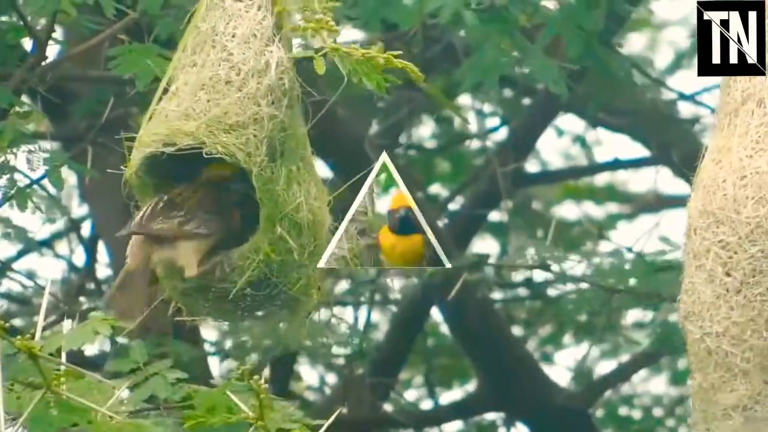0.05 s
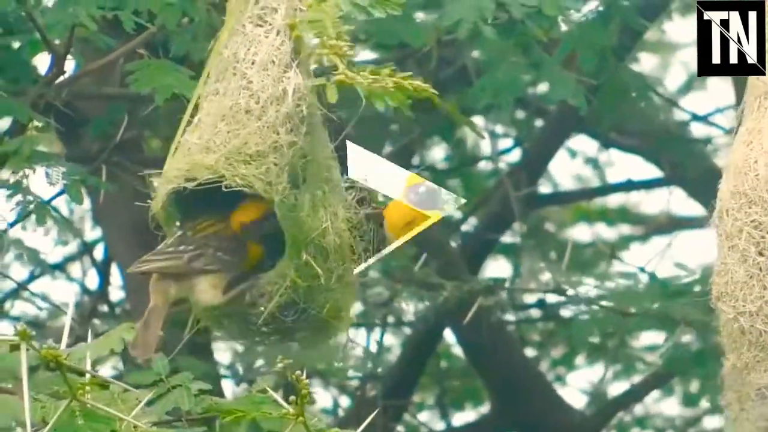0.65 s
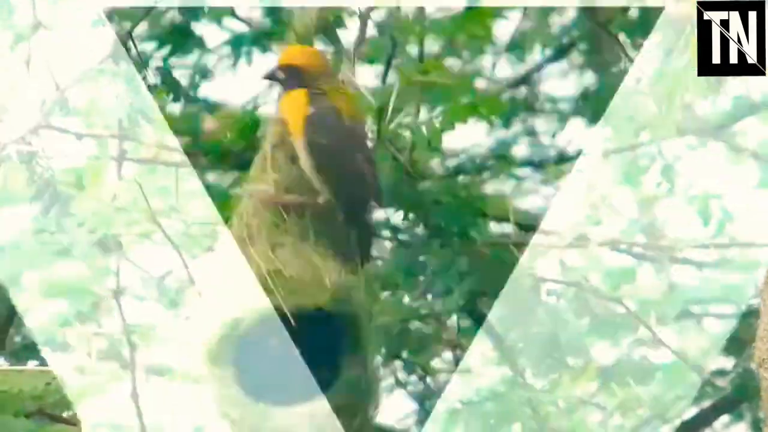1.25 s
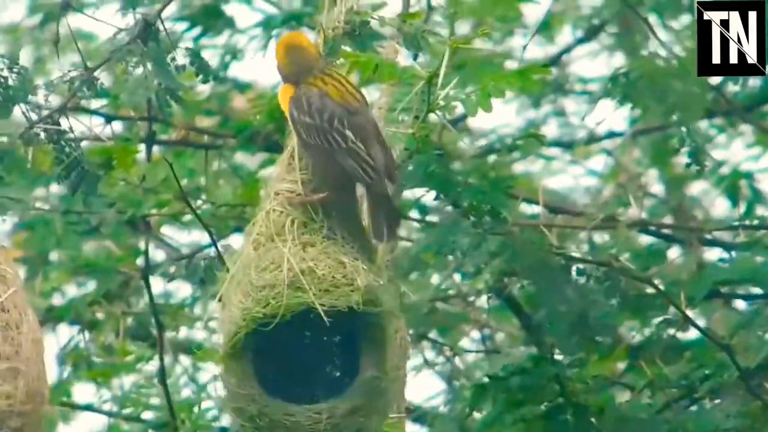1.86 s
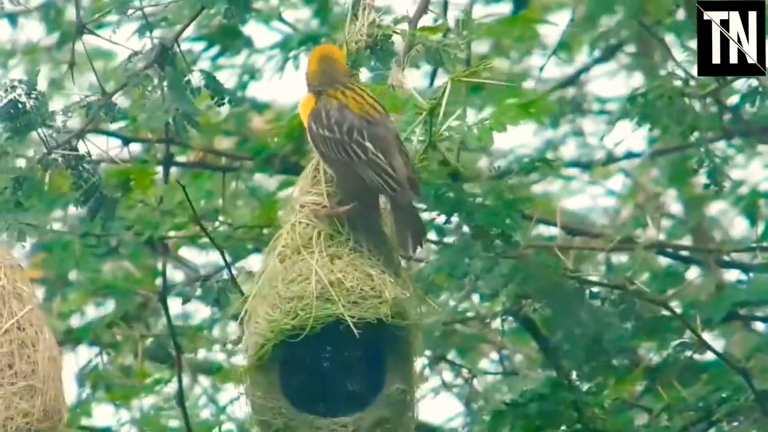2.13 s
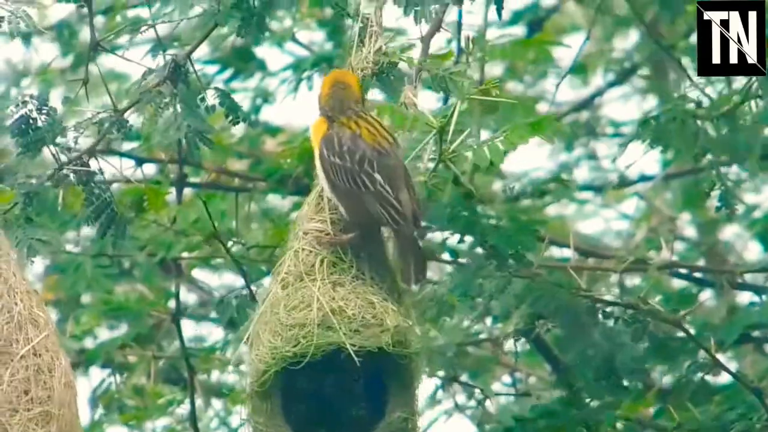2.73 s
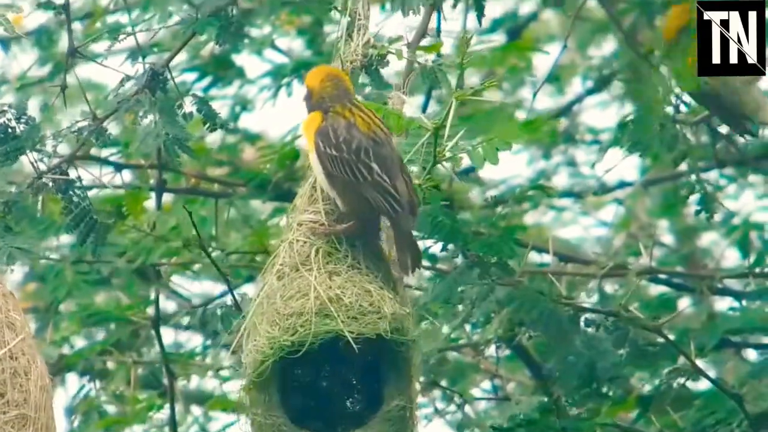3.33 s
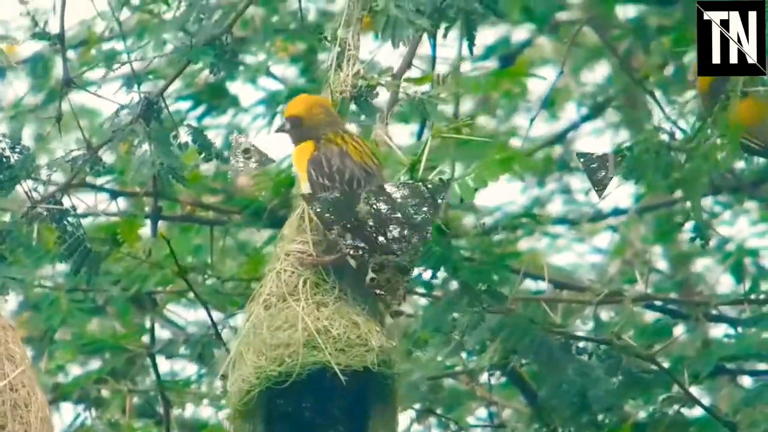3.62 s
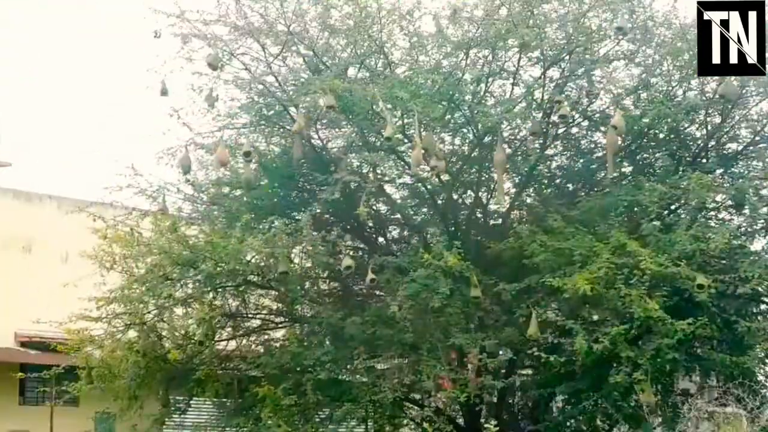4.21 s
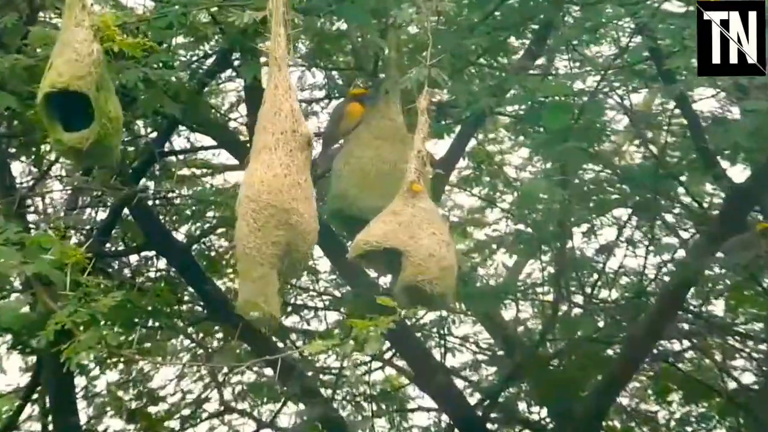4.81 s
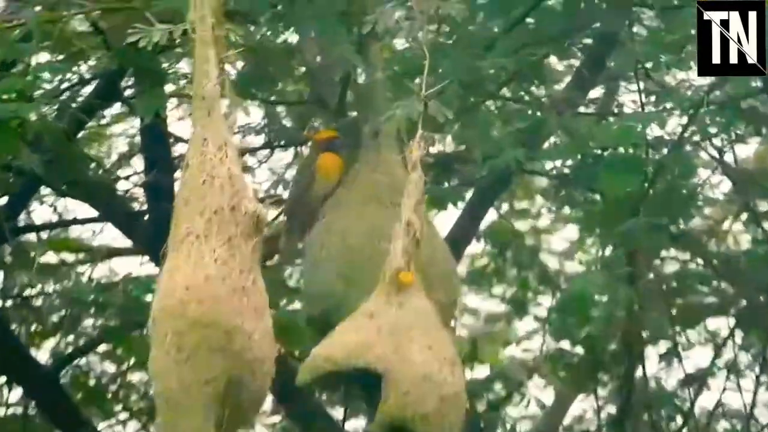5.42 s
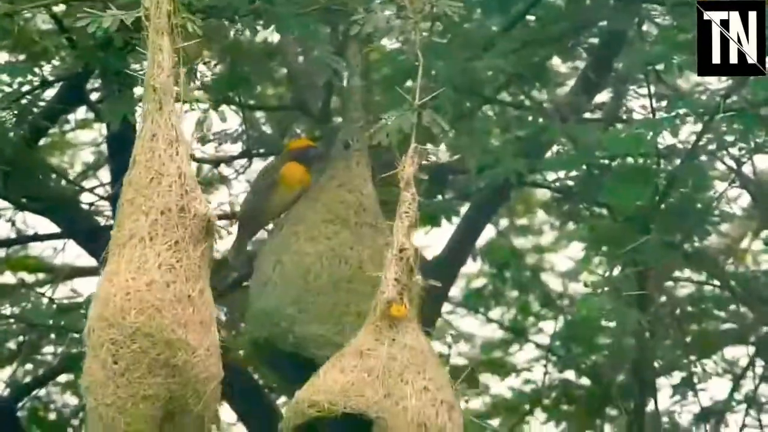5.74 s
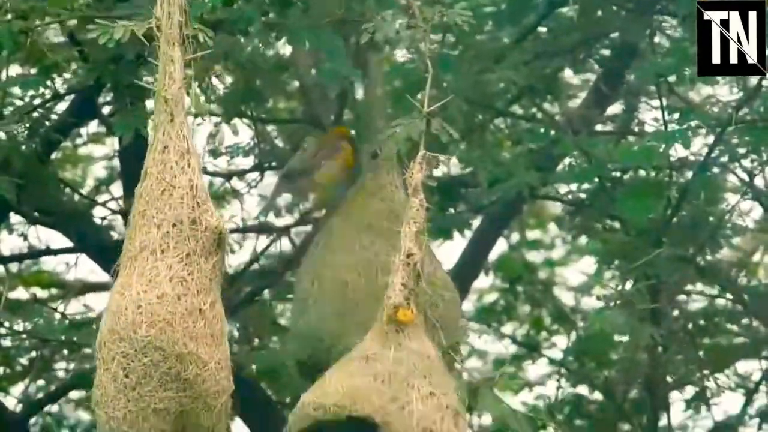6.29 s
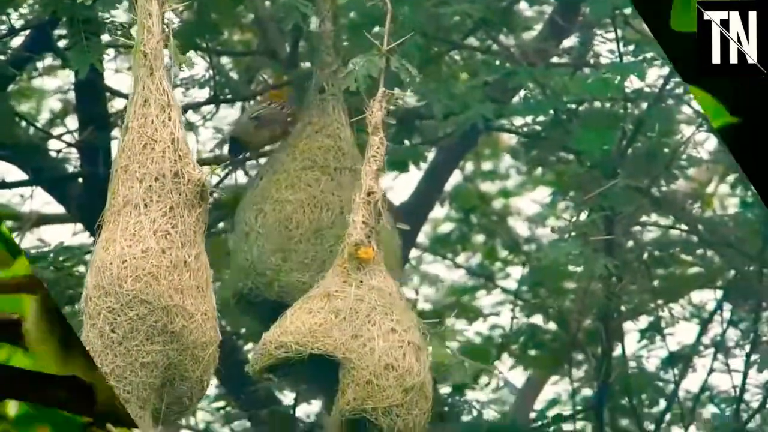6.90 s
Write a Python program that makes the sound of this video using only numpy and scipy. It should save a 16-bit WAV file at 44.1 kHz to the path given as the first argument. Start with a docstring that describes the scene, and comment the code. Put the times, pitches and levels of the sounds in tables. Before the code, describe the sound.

A colony of small birds calls in a tree outdoors, over a soft wash of distant noise. From the start, near birds give sharp, high chips and raspy buzzes above the dense twitter of the flock, slightly scattered by the leaves. From about 1 to 3 seconds, wheezy whistles follow one another, most sliding downward. The sound drops out for an instant at 3.4 seconds and returns at its loudest and busiest, with scolding buzzes, chips and two short whistles. After another tiny gap at 4.5 seconds the colony is calmer: a couple of falling whistles, then scattered peeps and chirps over quieter chatter. Around 5.8 to 6.4 seconds one whistle climbs and sinks again. The birds cut off at about 6.7 seconds, and after a brief silence only a very faint outdoor hiss remains until just past 7 seconds.

```python
"""A colony of weaver birds in a thorn tree, in four short stretches with brief silences between them.
First, near birds chip, buzz and draw out wheezy whistles over the chatter of the flock, while twigs
and leaves scatter the calls and a soft outdoor wash lies underneath. At 3.4 s the colony is at its
busiest. From 4.5 s it is calmer, and one whistle climbs and sinks again. From 6.8 s only the faint
wash is left, far from the tree."""
import sys
import numpy as np
from scipy import signal
from scipy.fft import rfft, irfft
from scipy.io import wavfile
from scipy.ndimage import uniform_filter1d

SR = 44100
rng = np.random.default_rng(int(sys.argv[2]) if len(sys.argv) > 2 else 0)


def transcribe(u):
    """Save the signal u as a 16-bit wav file named by the first command-line argument.

    u: samples, shape (n,) or (channels, n), limited to [-1, 1]; the rate is SR.
    q: integer samples, one column per channel.
    """
    v = np.clip(np.atleast_2d(u).T, -1, 1)
    q = np.round(v * 32767).astype(np.int16)
    wavfile.write(sys.argv[1], SR, q)


N = 315756
TIME = np.arange(N) / SR

# silences between the four stretches: (start [s], end [s])
SILENCES = [(3.383, 3.433), (4.476, 4.526), (6.659, 6.754)]


def whistles(trim_db):
    """Long, gliding notes that end a song; each swells to its loudest moment and fades."""
    # (time [s], length [s], start pitch [Hz], middle pitch [Hz], end pitch [Hz],
    #  relative peak level [dB], peak time [s], fade either side [dB/s], left minus right [dB])
    long_notes = [(0.949, 0.16, 5470, 5320, 5070, -47, .995, 80, -2),
                  (1.301, 0.18, 4100, 3910, 3716, -46.5, 1.34, 45, -2.5),
                  (1.528, 0.28, 3620, 3227, 2700, -44, 1.585, 72, -2),
                  (1.796, 0.12, 3750, 3644, 3910, -48, 1.84, 60, -2.5),
                  (1.969, 0.19, 5520, 5230, 4890, -44.5, 2.032, 90, 1.5),
                  (2.057, .13, 4220, 4170, 4040, -45.5, 2.1, 74, 1),
                  (2.159, 0.29, 4730, 4090, 3850, -40, 2.285, 82, 1.5),
                  (2.428, .14, 3700, 3490, 3270, -47.5, 2.48, 120, -0.5),
                  (2.754, 0.468, 2740, 2671, 2687, -52.5, 2.9, 11, -1.5),
                  (2.753, 0.38, 3080, 2752, 2595, -55, 2.8, 19, -2),
                  (4.076, 0.102, 4110, 3980, 4000, -38.5, 4.125, 131, 2),
                  (4.309, 0.17, 4120, 3914, 3610, -39, 4.352, 82, 2),
                  (4.528, 0.051, 4290, 4170, 4020, -54, 4.55, 40, 0),
                  (4.575, 0.31, 4000, 3690, 3420, -45.5, 4.615, 62, 0),
                  (4.868, 0.29, 3310, 3165, 3000, -46.5, 4.94, 60, -2),
                  (5.641, 0.21, 1394, 1473, 1565, -61, 5.81, 10, 1)]
    # one whistle that climbs and sinks again: (time [s], pitch [Hz], relative level [dB])
    climbing_path = [(5.829, 2380, -50), (5.88, 2350, -59), (5.98, 2470, -60), (6.04, 2750, -55),
                     (6.07, 3175, -57), (6.115, 3283, -46), (6.219, 3543, -49.5), (6.285, 3430, -55),
                     (6.39, 3030, -56)]
    out = np.zeros((2, N))
    for s, length, start_hz, middle_hz, end_hz, db, peak_s, fade_db_per_s, pan_db in long_notes:
        u = np.linspace(0, 1, int(length * SR))
        sag_db = fade_db_per_s * np.abs(s + u * length - peak_s)
        add(out, s, perch(wheeze(glide(u, start_hz, middle_hz, end_hz), db - sag_db), pan_db))
    s, hz, db = np.transpose(climbing_path)
    t = np.arange(s[0], s[-1], 1 / SR)
    climb = wheeze(np.interp(t, s, hz), np.interp(t, s, db))
    add(out, s[0], perch(climb, pan_db=-3.5))
    return from_db(trim_db) * foliage(out, t60=.2, wet_db=-8)


def near_chirps(chips_db, arches_db):
    """Short notes of the closest birds: two-voiced chips and arches, flat peeps, upward flicks."""
    # falling chips: (time [s], length [s], pitch [Hz], relative level [dB])
    chips = [(.088, .03, 3750, -53), (0.166, .03, 3400, -56), (0.302, .03, 4470, -53),
             (0.334, 0.037, 3910, -48.5), (0.414, .018, 5300, -55), (0.436, 0.045, 3570, -48.5),
             (0.517, 0.02, 3700, -51), (0.553, .025, 5450, -49), (0.616, .04, 4350, -54),
             (0.686, .027, 3910, -54), (0.751, 0.023, 5440, -53), (0.861, 0.029, 4140, -55),
             (0.924, .025, 5680, -48), (1.09, 0.034, 4150, -50), (1.115, .033, 3650, -55.5),
             (1.198, 0.025, 3490, -51), (1.236, 0.04, 4250, -47), (1.348, 0.021, 3400, -50),
             (1.382, 0.044, 3864, -47.5), (1.565, 0.033, 5250, -48.5), (1.608, .028, 3580, -47.5),
             (1.713, .048, 4070, -46), (1.885, 0.024, 5100, -55), (2.05, 0.042, 3360, -52.5),
             (2.257, 0.056, 3380, -52.5), (2.65, .025, 4030, -65), (2.885, .028, 3600, -55),
             (2.961, 0.023, 4000, -53.5), (3.141, .027, 3500, -50.5), (3.242, 0.026, 4250, -46.5),
             (3.327, 0.037, 3700, -49.5), (3.718, 0.039, 3940, -53), (3.914, 0.041, 4070, -40.5),
             (4.054, .03, 3490, -42.5), (4.857, .03, 4720, -58), (4.901, 0.03, 4000, -49),
             (4.942, 0.025, 3800, -61), (5.043, 0.041, 4050, -53), (5.07, .025, 3150, -53),
             (5.09, 0.03, 4000, -58), (5.196, 0.023, 3500, -50), (5.232, 0.032, 4250, -57.5),
             (5.336, 0.032, 3360, -54.5), (5.6, 0.0082, 2210, -55), (5.965, 0.015, 3570, -66),
             (6.353, 0.031, 6270, -54), (6.454, 0.026, 3750, -57.5), (6.464, 0.035, 5400, -55),
             (6.484, 0.069, 4215, -49.5), (6.571, .011, 1686, -55)]
    # peeps that hardly fall: (time [s], length [s], pitch [Hz], relative level [dB])
    peeps = [(0.023, 0.068, 3400, -57), (.205, .04, 3280, -51.5), (0.745, 0.016, 1830, -55.5),
             (3.611, 0.013, 3980, -48), (3.986, 0.033, 3560, -50), (5.39, 0.038, 4030, -54),
             (5.413, 0.028, 2780, -53), (5.495, 0.05, 4200, -58), (5.525, .025, 2850, -61.5),
             (5.576, 0.039, 4000, -53.5), (5.642, 0.021, 4050, -55), (5.745, .045, 4160, -54),
             (5.8, 0.02, 4000, -57), (5.919, 0.019, 3800, -57.5), (5.925, .03, 2850, -57),
             (6.399, 0.022, 2270, -56), (6.491, 0.025, 3900, -47.5)]
    # quick upward flicks: (time [s], pitch [Hz], relative level [dB])
    flicks = [(5.718, 3550, -61), (5.758, 5100, -61), (6.013, 3150, -59), (6.03, 3950, -60),
              (6.066, 5200, -60)]
    # chirps that rise and fall: (time [s], length [s], top pitch [Hz], relative level [dB])
    arches = [(1.441, 0.046, 5340, -54), (1.519, .04, 5800, -53), (1.656, .035, 5750, -60),
              (4.539, 0.071, 5800, -53), (4.75, 0.059, 5620, -52.5), (4.901, 0.034, 5580, -56),
              (5.156, .055, 5580, -57.5)]
    notes = []
    for s, length, hz, db in chips:
        lower = slide(length, hz, fall_octaves=.295)
        upper = slide(length, hz * 1.4, fall_octaves=.295)
        notes.append((s, db, lower + from_db(-10.5) * upper))
    notes += [(s, db, slide(length, hz, fall_octaves=.038)) for s, length, hz, db in peeps]
    notes += [(s, db, slide(.022, hz, fall_octaves=-.295)) for s, hz, db in flicks]
    out = np.zeros((2, N))
    for s, db, sound in notes:
        add(out, s, from_db(db + chips_db) * perch(sound, pan_db=rng.uniform(-2, 3.2)))
    for s, length, top_hz, db in arches:
        for hz, voice_db in ((top_hz, 0), (top_hz * .835, -7)):
            chirp = note(length, hz * .89, hz, hz * .89, waver=.01, rasp=.45)
            add(out, s, from_db(db + voice_db + arches_db) * chirp)
    return foliage(out, t60=.2, wet_db=-8)


def buzzes(trim_db):
    """Held, scolding calls: the pitch shakes so fast and far that the tone turns to a rasp."""
    # (time [s], length [s], start pitch [Hz], end pitch [Hz], waver [share], relative level [dB])
    scolds = [(0, 0.42, 5685, 5750, 0.041, -51.5), (0.869, 0.13, 4530, 4300, 0.11, -54),
              (1.68, .11, 4500, 3850, .05, -49.5), (3.003, .13, 5750, 5780, 0.025, -52.5),
              (3.439, 0.1, 4310, 3860, 0.064, -46), (3.535, 0.13, 6530, 6600, 0.043, -55),
              (3.66, .11, 4570, 3990, 0.11, -43.5), (3.782, 0.12, 5670, 5090, .1, -45.5),
              (3.819, .14, 4350, 4060, .05, -45.5), (4.084, .1, 4110, 3980, .035, -42),
              (4.219, .14, 4450, 4000, .035, -45), (4.215, 0.1, 6660, 6700, 0.073, -47.5)]
    out = np.zeros((2, N))
    for s, length, start_hz, end_hz, waver, db in scolds:
        buzz = note(length, start_hz, (start_hz + end_hz) / 2, end_hz, waver, rasp=.31)
        add(out, s, from_db(db) * buzz)
    return from_db(trim_db) * foliage(out, t60=.14, wet_db=-2)


def syrinx(hz, waver, rasp, overtone_db):
    """A bird's voice: a nearly pure tone with a weak octave; its pitch wavers, its level flutters."""
    phase = 2 * np.pi * np.cumsum(hz * (1 + waver * drift(500, len(hz)))) / SR
    flutter = (1 + rasp * drift(700, len(hz))) / np.hypot(1, rasp)
    return np.sqrt(2) * flutter * (np.sin(phase) + from_db(overtone_db) * np.sin(2 * phase))


def wheeze(hz, db):
    """A drawn-out, shimmering note with soft ends; the higher, the wheezier."""
    strain = hz / 4000 + np.clip((hz - 5400) / 150, 0, 3)   # the very top turns to a buzz
    tone = syrinx(hz, waver=.008 * strain, rasp=.36 * strain, overtone_db=-32)
    shimmer_db = 1.6 * drift(109.2, len(hz))
    return tone * from_db(db + shimmer_db) * signal.windows.tukey(len(hz), .1)


def note(length, start_hz, middle_hz, end_hz, waver, rasp):
    """One call: the pitch bends through three points while the level swells and fades."""
    u = np.linspace(0, 1, max(int(length * SR), 64))
    swell = np.sqrt(np.abs(np.sin(np.pi * u)))
    return swell * syrinx(glide(u, start_hz, middle_hz, end_hz), waver, rasp, overtone_db=-19.5)


def slide(length, hz, fall_octaves):
    """A short note that slides evenly through its pitch."""
    half_fall = 2 ** (fall_octaves / 2)
    return note(length, hz * half_fall, hz, hz / half_fall, waver=.015, rasp=.5)


def glide(u, start_hz, middle_hz, end_hz):
    """Pitch bending through three points as u goes from 0 to 1."""
    bow_hz = middle_hz - (start_hz + end_hz) / 2
    return start_hz + (end_hz - start_hz) * u + bow_hz * (1 - (2 * u - 1) ** 2)


def flock():
    """The chatter bed: single chips stand out of the farthest birds, which merge into a hiss."""
    # colour of the hiss, busy and calm: (frequency [Hz], relative level [dB])
    busy_colour = [(1300, -36), (2000, -13.5), (2900, -6), (3350, -2), (4100, -8), (4700, -15), (5500, -7),
                   (6100, -8), (6600, -9), (7200, -14.5), (9000, -16), (11700, -18), (12800, -28),
                   (15000, -38.5)]
    calm_colour = [(2200, -32), (2780, 7), (3500, -5.5), (4200, 4.5), (4700, -14), (5500, 1), (6050, -8),
                   (6550, -0.5), (7200, -9), (9800, -9), (10500, -14.5), (15000, -28.5)]
    calls = flock_calls(calls_per_s=215, upper_voice_db=-7)
    busy = calls + stereo_noise(busy_colour) * from_db(-4 + 1.7 * drift(80))   # flickering hiss
    calm = calls + stereo_noise(calm_colour) * from_db(1)
    return flock_level() * np.where(TIME < SILENCES[1][1], rms_one(busy), rms_one(calm))


def flock_calls(calls_per_s, upper_voice_db):
    """Dozens of birds, near and far, give tiny two-voiced chips; their sum is evened in level."""
    calls = np.zeros((2, N))
    crowd = np.cumsum(np.sqrt(flock_level()))   # the louder the flock, the more birds are calling
    for when, height, bend, fall, span, distance, side in rng.random((int(calls_per_s * N / SR), 7)):
        s = np.searchsorted(crowd, when * crowd[-1]) / SR
        pitch, length = 3450 * 1.62 ** height, .009 + .024 * span
        start, end = 1.14 - .21 * bend, 1 - .12 * fall   # most notes fall, some arch
        for ratio, voice_db in ((1, 0), (1.1 + .15 * fall, upper_voice_db - 5 * height)):
            hz = pitch * ratio
            chip = note(length, start * hz, hz, end * hz, waver=.01, rasp=.4)
            gain = from_db(voice_db - 4 * height) / (1 + 1.7 * distance)
            add(calls, s, gain * perch(chip, pan_db=7 * (side - .42)))
    calls = foliage(calls, t60=.2, wet_db=-5)
    running_power = uniform_filter1d(np.mean(calls ** 2, axis=0), size=SR // 16)
    return calls / np.sqrt(running_power + 1e-4)


def flock_level():
    """The flock's gain at every sample; the last stretch is too far from the colony to hear it."""
    # swells of the chatter in the first three stretches: (time [s], relative level [dB])
    opening = [(0.0, -44.5), (0.36, -44.0), (0.72, -52.0), (0.9, -45.5), (1.2, -51.0), (1.26, -46.0),
               (1.5, -49.0), (1.81, -46.0), (1.87, -51.5), (1.93, -46.5), (2.11, -47.0), (2.17, -49.5),
               (2.29, -45.0), (3.37, -48.0)]
    busiest = [(3.46, -42.0), (3.54, -43.5), (3.58, -42.0), (3.7, -40), (3.78, -42), (3.84, -39.5),
               (4.02, -41.5), (4.26, -38.5), (4.46, -40.5)]
    calm = [(4.7, -56), (5.21, -51.5), (5.33, -56.0), (5.66, -52.0), (5.99, -55.0), (6.11, -52.0),
            (6.59, -52.5), (6.65, -58.5)]
    return by_stretch(from_db(-2) * level(opening), from_db(-2.5) * level(busiest),
                      from_db(-2) * level(calm), 0)


def perch(sound, pan_db):
    """Each bird sits on its own twig: a little to one side, so louder and earlier in that ear."""
    at = np.arange(len(sound))
    lead_samples = pan_db * .17
    return np.array([from_db(ear * pan_db / 2) * np.interp(at + ear * lead_samples, at, sound)
                     for ear in (1, -1)])


def foliage(x, t60, wet_db):
    """Twigs and leaves return many faint echoes, different at each ear; the power stays the same."""
    age = TIME[:SR // 2]
    twigs = rng.standard_normal((2, len(age))) * (rng.random((2, len(age))) < .1)
    echoes = twigs * from_db(-60 * age / t60)
    echoes /= np.sqrt(np.sum(echoes ** 2, axis=1, keepdims=True))
    wet = from_db(wet_db)
    return (x + wet * signal.fftconvolve(x, echoes, axes=1)[:, :N]) / np.hypot(1, wet)


def from_tree(x, left_lag_s):
    """The tree stands a little to the right, so its sound reaches the left ear slightly late."""
    delay = np.exp(-2j * np.pi * np.arange(N // 2 + 1) * SR / N * left_lag_s)
    return np.array([irfft(rfft(x[0]) * delay, N), x[1]])


def outdoors(wash_db):
    """A wavering wash of distant noise with a few faint tones, and a low drone in the calm stretch."""
    # colour of the wash, by the tree and far from it: (frequency [Hz], relative level [dB])
    tree_colour = [(20, -23), (60, -14.5), (130, -13), (280, -9.5), (500, -4.5), (800, 2.5), (1050, 0.5),
                   (1550, -2.5), (2600, -7.5), (4000, -6), (9000, -20), (15000, -62)]
    far_colour = [(50, -12), (300, -8), (450, 0.5), (1900, 0), (3800, -11), (12000, -19), (15000, -26)]
    # swells of the wash in the first and third stretch: (time [s], relative level [dB])
    opening = [(0.0, -56.5), (0.72, -58), (2.89, -57), (2.97, -51.5), (3.37, -59)]
    calm = [(4.55, -55.5), (4.95, -57), (5.68, -58), (5.76, -55.5), (6.25, -56.5), (6.65, -55)]
    # far-off steady tones: (time [s], length [s], pitch [Hz], level [dB])
    far_tones = [(2.928, 0.41, 1258, -63), (3.776, 0.3, 717, -64), (7.084, .031, 1370, -67)]
    by_tree = TIME < SILENCES[2][1]
    noise = np.where(by_tree, stereo_noise(tree_colour), stereo_noise(far_colour))
    gain = by_stretch(level(opening), from_db(-56.5), level(calm), from_db(-69))
    out = from_db(wash_db + .5 * drift(25)) * gain * noise
    for s, length, hz, db in far_tones:
        add(out, s, from_db(db) * note(length, hz, hz, hz, waver=.02, rasp=.17))
    drone_hz, drone_db = 45, -83
    drone = np.sqrt(2) * np.sin(2 * np.pi * drone_hz * TIME + .5 * drift(8))
    drone *= from_db(drone_db + 2 * drift(8.9))
    return out + drone * by_tree * (TIME > SILENCES[1][1])


def stereo_noise(colour):
    """Coloured noise, partly shared by the ears; rms 1."""
    # likeness of the two ears: (frequency [Hz], correlation [0-1])
    likeness = [(50, 0.62), (700, 0.76), (1400, 0.55), (2800, 0.17), (4500, 0.2), (8000, 0), (14000, 0)]
    mid, side = rfft(rng.standard_normal((2, N)))
    alike = np.clip(by_frequency(likeness), 0, 1)
    ears = np.sqrt(1 + alike) * mid + np.sqrt(1 - alike) * side * [[1], [-1]]
    return rms_one(irfft(ears * from_db(by_frequency(colour)), N))


def by_stretch(*gains):
    """One gain for each of the four stretches, switched in the middle of the silences."""
    return np.choose(np.searchsorted(np.mean(SILENCES, axis=1), TIME), gains)


def by_frequency(points):
    """A (frequency [Hz], value) curve read at every Fourier bin."""
    hz, value = np.transpose(points)
    return np.interp(np.log(np.arange(N // 2 + 1) * SR / N + 1), np.log(hz), value)


def level(rows):
    """Gain at every sample from (time [s], level [dB]) rows."""
    return from_db(np.interp(TIME, *np.transpose(rows)))


def drift(rate, size=N):
    """Random modulation through `rate` points a second; spread 1."""
    knots = rng.standard_normal(int(size / SR * rate) + 2)
    return np.interp(np.arange(size) / SR * rate, np.arange(len(knots)), knots) * np.sqrt(3 / 2)


def add(track, s, sound):
    """Mix a sound into a track at time s."""
    start = max(int(s * SR), 0)
    piece = sound[..., :max(N - start, 0)]
    track[..., start:start + piece.shape[-1]] += piece


def from_db(db):
    """Decibels to gain."""
    return 10 ** (np.asarray(db) / 20)


def rms_one(x):
    """Scale to unit power."""
    return x / np.sqrt(np.mean(x ** 2) + 1e-20)


def scene():
    """Near birds and the flock in the tree, over the outdoor wash."""
    near_birds = near_chirps(chips_db=2.5, arches_db=4.5) + whistles(trim_db=-.33) + buzzes(trim_db=2.1)
    return from_tree(near_birds + flock() + outdoors(wash_db=1.5), left_lag_s=6e-5)


def record(dry):
    """The sound dies away into each silence and fades in after it; the top treble is cut."""
    dying_s, fade_in_s, cutoff_hz = .003, .016, 15000
    for start, end in SILENCES:
        fade_out = np.exp(-np.clip((TIME - start) / dying_s + 2, 0, 20))
        fade_in = np.clip((TIME - end) / fade_in_s, 0, 1)
        dry = dry * np.maximum(fade_out, fade_in)
    return signal.sosfilt(signal.ellip(12, .1, 80, cutoff_hz, fs=SR, output="sos"), dry)


dry = scene()
out = record(dry)
transcribe(out)
```